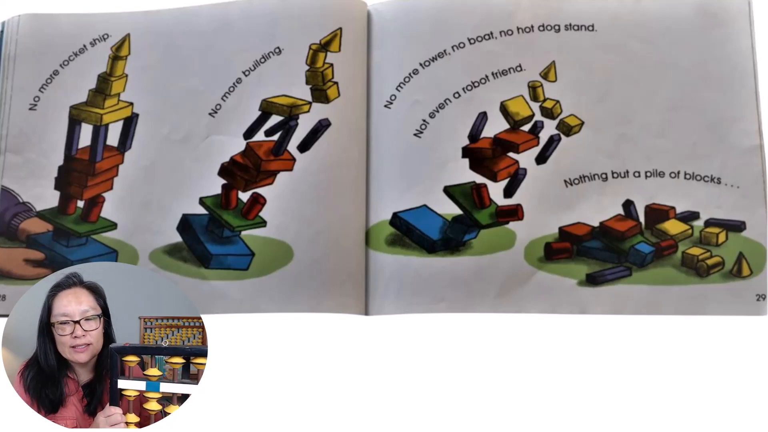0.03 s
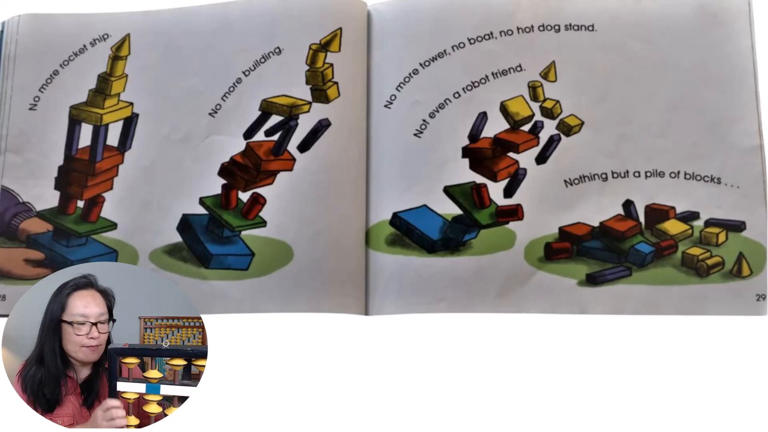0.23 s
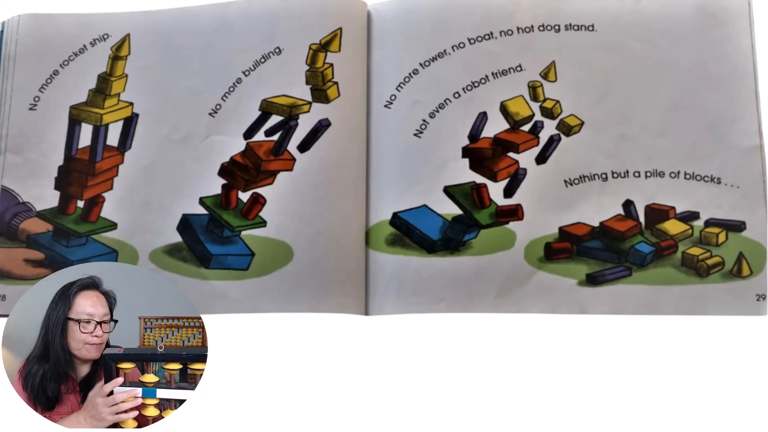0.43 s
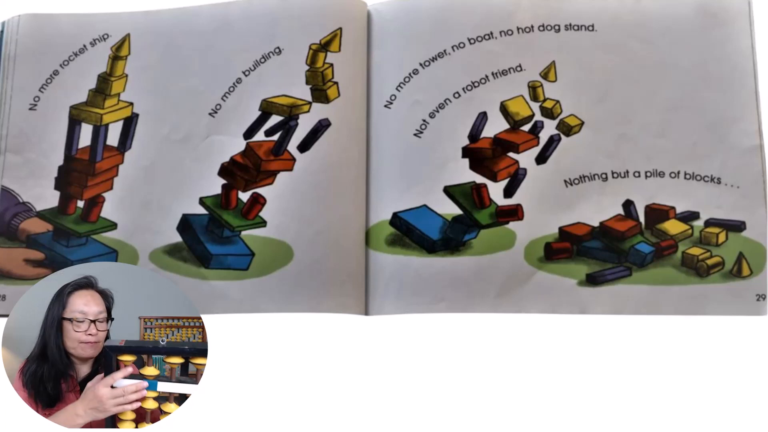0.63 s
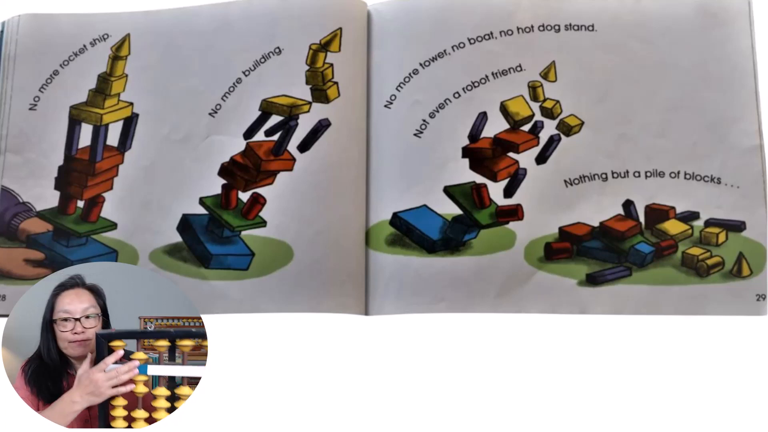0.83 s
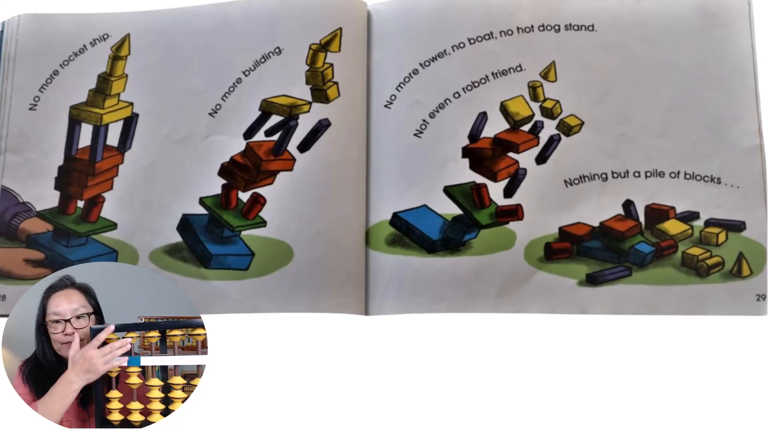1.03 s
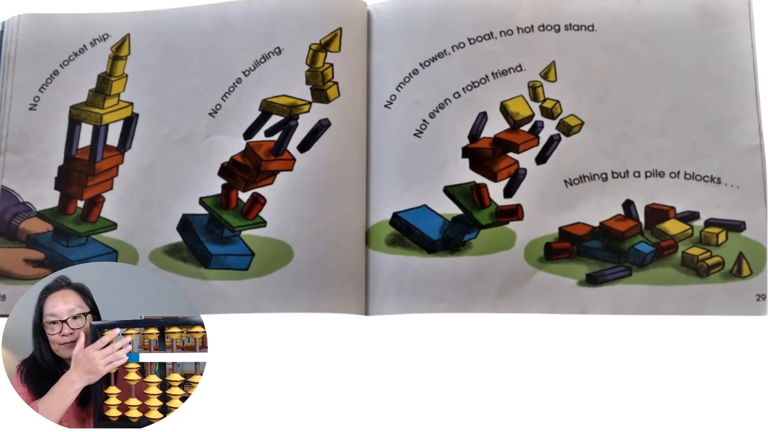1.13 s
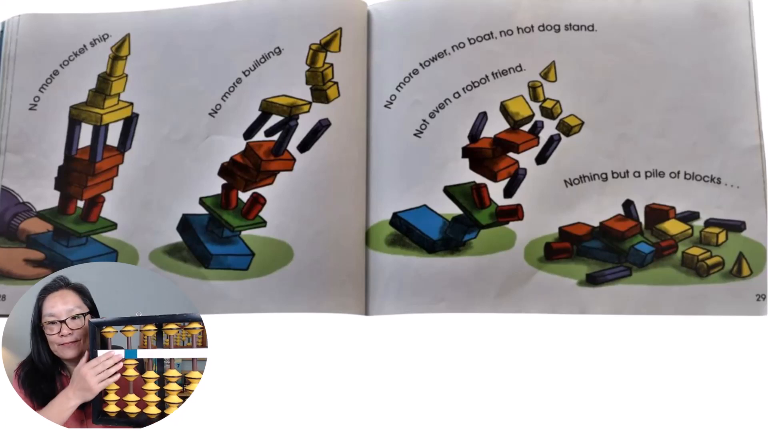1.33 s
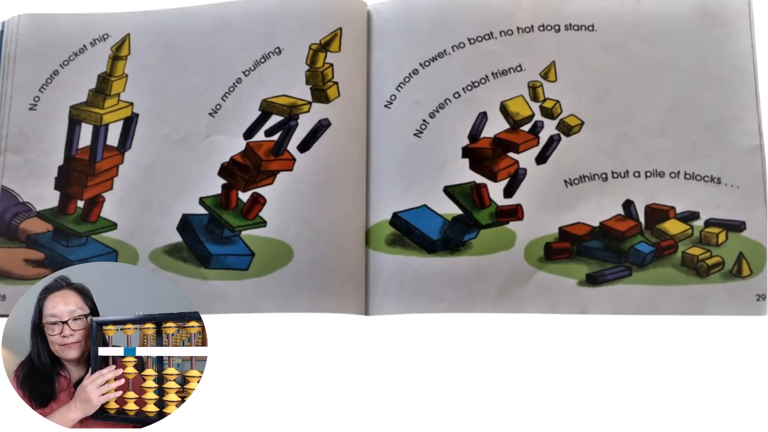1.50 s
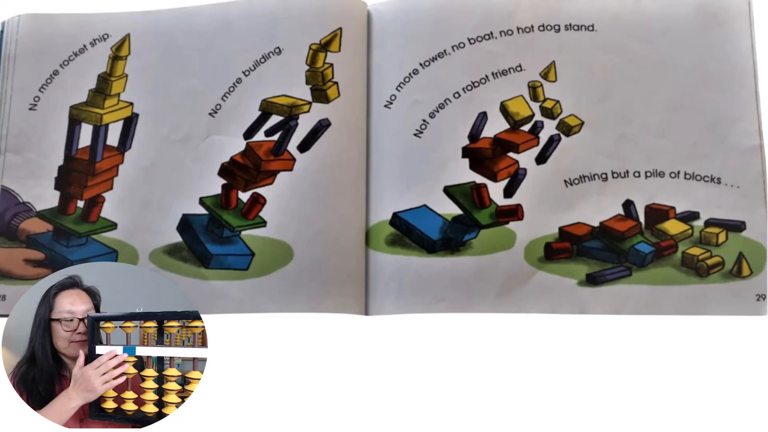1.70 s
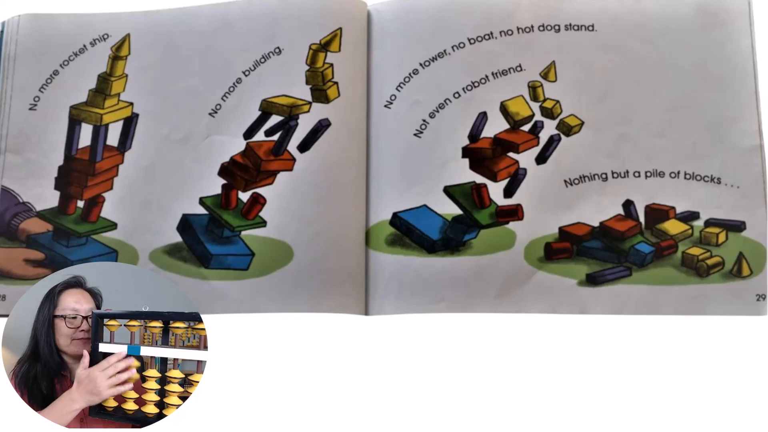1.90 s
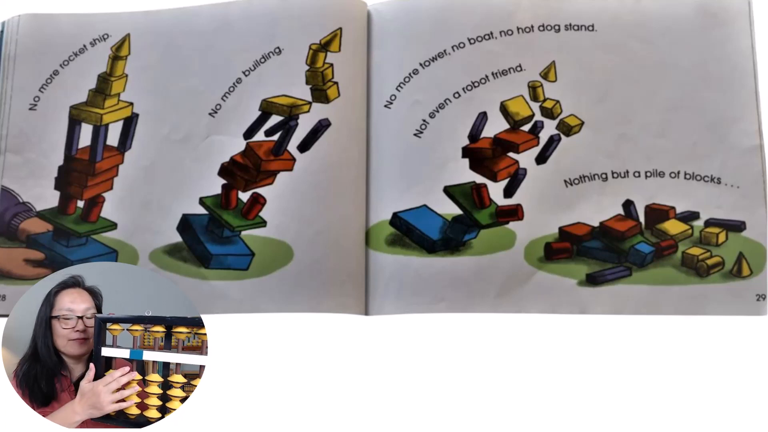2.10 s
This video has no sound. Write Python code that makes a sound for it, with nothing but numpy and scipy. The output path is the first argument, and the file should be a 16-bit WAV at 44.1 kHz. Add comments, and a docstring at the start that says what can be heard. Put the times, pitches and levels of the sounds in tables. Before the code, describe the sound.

Abacus beads slide and clack sharply three times among lighter ticks in a quiet room.

```python
"""A small quiet room, a computer microphone close to a large abacus whose beads a hand pushes along.
Beads hiss along their rods, tick against each other and clack into the beam three times.
Each contact is a short rattle that rings bead, wooden frame and rod and makes the frame thump.
The grip rustles at first; a short room tail follows the clicks, over faint hum and hiss."""
import sys
import numpy as np
from scipy import signal
from scipy.fft import rfft, irfft
from scipy.io import wavfile
from scipy.ndimage import uniform_filter1d

SR = 44100
rng = np.random.default_rng(int(sys.argv[2]) if len(sys.argv) > 2 else 0)


def wrap_up_sound(samples):
    """Save the sound to the file named by the first command line argument, as 16-bit audio."""
    columns = np.atleast_2d(samples).T
    # keep every value between -1 and 1, then stretch to whole-number steps
    tamed = np.clip(columns, -1, 1)
    steps = np.round(tamed * 32767).astype(np.int16)
    wavfile.write(sys.argv[1], SR, steps)


N = 94903


def undb(db):
    return 10 ** (np.asarray(db) / 20)


def at_rms(x, db):
    return x * undb(db) / np.sqrt(np.mean(x ** 2))


def at_peak(x, db):
    return x * undb(db) / np.abs(x).max()


def ring(x, hz, t60):
    """One decaying mode driven by x; it radiates little far below its pitch."""
    pole = np.exp(2j * np.pi * hz / SR - np.log(1000) / (t60 * SR))
    mode = signal.lfilter([1], [1, -pole], x).imag
    return signal.lfilter(*signal.butter(2, .5 * hz, "high", fs=SR), mode)


def band(hz, width, size=N):
    """Noise of rms 1 in a resonance."""
    return at_rms(signal.lfilter(*signal.iirpeak(hz, hz / width, SR), rng.standard_normal(size)), 0)


def drift(hz):
    """A smooth random wander of rms 1."""
    span = int(SR / hz)
    return at_rms(uniform_filter1d(uniform_filter1d(rng.standard_normal(N), span), span), 0)


# Hiss spectrum: (frequency [Hz], relative density [dB])
HISS_SPECTRUM = [(15, -32), (25, -5.5), (273, 0.5), (571, -18), (730, -11), (2100, -12), (2270, -19),
                 (2440, -25), (2690, -16), (6530, -18.5), (9000, -59.5), (11700, -65), (19800, -120)]
# Hum: (pitch [Hz], width [Hz], level [dB])
HUM_BANDS = [(100, 14, -74.5), (193, 5.4, -76), (240, 44, -70.5)]


def room_tone():
    """The bed of the room: faint, flickering hiss in half-octave bands and a wavering hum."""
    hz, db = np.array(HISS_SPECTRUM).T
    hiss = sum(undb(np.interp(np.log(f), np.log(hz), db) + .5 * drift(8)) * np.sqrt(f) * band(f, f / 3)
               for f in 30 * 2 ** np.arange(0, 8.2, .5))
    hum = sum(undb(hum_db) * band(f, width) for f, width, hum_db in HUM_BANDS)
    return at_rms(hiss, -73.5) + hum


# Decay of the small room: (band centre [Hz], t60 [s])
ROOM_DECAY = [(300, 0.44), (900, 0.2), (2000, 0.14), (4000, 0.19), (7000, 0.21)]
ROOM_DB, ROOM_GAP_S = -17.5, 0.0067
SPLIT_HZ = 2400  # between low and high, for the room's colour and the frame's modes


def room_tail(size):
    """The walls' dense response, weak this close to the source; each band has its own decay."""
    t = np.arange(size) / SR
    tail = sum(np.sqrt(hz) * band(hz, .61 * hz, size) * undb(-60 * t / t60) for hz, t60 in ROOM_DECAY)
    tail *= np.clip(t / ROOM_GAP_S - 1, 0, 1) * (t < .9 * t[-1])
    return undb(ROOM_DB) * tail / np.sqrt(np.sum(tail ** 2))


def reflections(direct, tail):
    """The walls hear the abacus from all sides, which evens out its colour in the tail."""
    size = len(direct)
    power = np.abs(rfft(direct)) ** 2
    fine, broad = (uniform_filter1d(power, int(blur_hz * size / SR)) for blur_hz in (454, 900))
    hz = np.arange(len(power)) * SR / size
    return irfft(np.sqrt(np.where(hz < SPLIT_HZ, fine, broad)) * rfft(tail))


# Hand on the frame: (time [s], rustle gain [dB], rumble level [dB])
GRIP_LEVELS = [(0, -68.5, -58), (0.04, -64, -73), (.12, -81.5, -74), (.16, -77, -75), (0.188, -69, -76),
               (0.218, -79.5, -68), (0.262, -65.5, -59), (.32, -78, -67), (.4, -81, -94), (.5, -82, -79),
               (0.55, -62.5, -65.5), (.6, -82, -76), (0.699, -102, -90)]
# Rustle colour: (centre [Hz], width [Hz], relative level [dB])
RUSTLE_BANDS = [(556, 750, 9), (1036, 170, 2.5), (2200, 440, -22.5), (5500, 11000, -3)]


def grip(t):
    """Fingers shift on the frame: a patchy rustle and a low rumble that die away."""
    times, rustle_db, rumble_db = np.array(GRIP_LEVELS).T
    rustle = sum(undb(db + 2.5 * drift(40)) * band(hz, width) for hz, width, db in RUSTLE_BANDS)
    rumble = band(hz=66, width=60)
    return undb(np.interp(t, times, rustle_db)) * rustle + undb(np.interp(t, times, rumble_db)) * rumble


# Bead pushes: (start [s], stop [s], gain at the stop [dB], rise [dB])
PUSHES = [(0.871, 0.985, -54, 29.5), (1.344, 1.412, -55, 12), (1.842, 1.956, -56, 2)]
# Bead rubbing on rod: (centre [Hz], width [Hz], relative level [dB])
FRICTION_BANDS = [(1820, 1200, -3), (4600, 1200, -1.5), (6900, 600, 0)]


def bead_slides(t):
    """A bead speeds up along its rod: grainy hiss that swells until it lands."""
    swell = sum(undb(db - rise_db * (stop - t) / (stop - start))
                * np.clip((t - start) / .02, 0, 1) * (t < stop) for start, stop, db, rise_db in PUSHES)
    grain = undb(1.5 * drift(150))
    return swell * grain * sum(undb(db) * band(hz, width) for hz, width, db in FRICTION_BANDS)


# Landed beads: (time [s], pitch [Hz], width [Hz], level [dB], t60 [s])
LANDINGS = [(0.99, 7000, 200, -41.5, 0.29), (1.725, 6680, 509, -51.5, 0.17)]


def bead_chatter(t):
    """A landed bead chatters on: a high, thin, grainy zing that fades."""
    return sum(undb(db - 60 * np.abs(t - start) / t60 + 4 * drift(120)) * (t > start) * band(hz, width)
               for start, hz, width, db, t60 in LANDINGS)


# Whole-frame modes: (pitch [Hz], relative gain [dB], t60 [s])
THUMP_MODES = [(64.5, -13.5, 0.033), (122, 6.5, 0.021), (210, -5.5, 0.03), (477, 1, 0.03)]


def frame_thump(impulse):
    """The blow shakes the whole frame in a few short, low modes."""
    return -sum(undb(db) * ring(impulse, hz, t60) for hz, db, t60 in THUMP_MODES)


# Rod modes: (pitch [Hz], relative gain [dB], t60 [s])
ROD_MODES = [(1000, -14, .06), (3345, -3, .075), (4390, 0, .11), (6400, -9, .08)]


def rod_ring(impulse, ms, noise, scatter):
    """A struck rod rings on with a wavering level, its modes balanced anew at each hit."""
    modes = sum(undb(db + 3 * draw) * ring(impulse, hz, t60)
                for (hz, db, t60), draw in zip(ROD_MODES, scatter))
    waver_db = 2.2 * at_rms(uniform_filter1d(noise, int(.005 * SR)), 0)
    onset = 1 - np.exp(-ms / .5)
    return modes * onset * undb(waver_db)


# Frame modes: (pitch [Hz], relative level [dB], t60 [s])
FRAME_MODES = [(836.5, -4, 0.064), (1075, -4.5, 0.031), (1290, -11, 0.03), (1871, -2.5, 0.023),
               (2050, 1, 0.012), (2810, 5, 0.011), (3331, 6.5, 0.0089), (3933, 10.5, 0.0044),
               (4713, 9.5, 0.0047), (5198, 5.5, 0.011), (6064, 4, 0.01), (6860, 7, 0.011), (7250, 3, 0.018)]


def frame_clack(knock, rattle, scatter, low_db, high_db):
    """The knock rings the frame's low modes, the rattle its high ones, slightly detuned at each hit."""
    low = high = 0
    for (hz, db, t60), draw in zip(FRAME_MODES, scatter):
        pitch = hz * (1 + .015 * draw)
        if hz < SPLIT_HZ:
            low += at_rms(ring(knock, pitch, t60), db)
        else:
            high += at_rms(ring(rattle, pitch, t60), db)
    return at_peak(low, low_db) + at_peak(high, high_db)


# Bead hits close to the microphone; levels are peaks, bead and frame ahead of their low cut:
# (time [s], rattle [ms], bead pitch [Hz], bead level [dB], bright pitch [Hz], bright level [dB],
#  frame low [dB], frame high [dB], rod level [dB], thump level [dB])
BEAD_HITS = [ (0.0105, 10.3, 398, -34, 5346, -42, -45, -35, -59, -89),
             (0.1875, 3.3, 1200, -50, 6400, -59, -50.5, -74, -76, -50),
             (0.232, 6.1, 2200, -70, 7440, -63, -66, -77, -83, -58),
             (0.246, 2.1, 1000, -68, 6900, -54, -65, -68, -80, -76),
             (0.2555, 12, 1960, -70, 4860, -51, -49.5, -53, -72, -63),
             (0.2783, 1.6, 900, -36.5, 6810, -50.5, -30, -46.5, -80, -71),
             (0.531, 9.3, 1230, -46, 3340, -50, -48, -72, -76, -74),
             (0.5385, 3.4, 2390, -33.5, 4440, -34, -49, -51, -58, -81),
             (0.5395, 3.9, 3620, -30, 6300, -28.5, -65, -30, -53, -81),
             (0.6494, 5.3, 1945, -50.5, 7760, -68, -87, -65, -65, -81),
             (0.7055, 1.4, 1920, -77.5, 6200, -62.5, -53.5, -55.5, -102, -82.5),
             (0.7255, 1.4, 3450, -68.5, 6500, -57, -66.5, -77, -68.5, -93),
             (0.817, 3.6, 2120, -74, 6730, -60.5, -67.5, -78, -73, -76.5),
             (0.968, 27, 1670, -48.5, 7000, -65.5, -53, -69.5, -44.5, -84),
             (0.9866, 2.9, 1383, -9, 6900, -15, -17.5, -8, -49, -34.5),
             (0.9873, 6.5, 2120, -10, 2540, -14.5, -30.5, -11.5, -60.5, -62),
             (1.03, 4.6, 1510, -47.5, 6900, -48.5, -56, -50.5, -87, -51.5),
             (1.0899, 1.6, 1825, -48, 6900, -70, -69.5, -37.5, -35.5, -81),
             (1.131, 7.9, 1860, -55.5, 6900, -80, -56.5, -52, -90, -79),
             (1.2126, 2.9, 6390, -39.5, 4600, -36, -43.5, -36, -65, -81),
             (1.3129, 4.1, 1650, -60.5, 6570, -80, -53.5, -54, -55.5, -65.5),
             (1.3848, 41, 942, -39.5, 6050, -44.5, -32, -27.5, -66.5, -84.5),
             (1.4035, 4, 2590, -50.5, 6500, -39.5, -58, -26, -76, -90),
             (1.4127, 2.2, 3720, -15, 6400, -4, -9, 2.5, -43, -26.5),
             (1.6357, 2.05, 2570, -53, 5200, -53, -49, -45, -49, -89),
             (1.661, 2, 2110, -66, 3300, -55, -54.5, -62.5, -59, -102),
             (1.721, 7.8, 975, -38.5, 6290, -22, -34, -17.5, -22.5, -64.5),
             (1.8213, 2, 1000, -46, 4670, -28, -38, -41, -76.5, -69),
             (1.8682, 5, 2195, -37.5, 6670, -39.5, -37, -41.5, -32.5, -75),
             (1.938, 3.05, 1857, -9, 6265, -16, -11, -2.5, -54, -27.5),
             (2.093, 2.2, 2930, -96, 4900, -62.5, -63.5, -62, -89, -87),
             (2.108, 1.8, 5000, -66.5, 6700, -60.5, -61.5, -61.5, -84, -70.5)]
ATTACK_MS, FADE_MS, RELEASE_MS = .29, 3.9, 2.6
KNOCK_SHARE = .43  # of the rattle: the low modes answer mostly to its first contacts


def bead_clicks(size=16384):
    """A bead hits a neighbour or the beam in a dense rattle; bead, frame, rod and room answer."""
    out, ms = np.zeros(N + size), np.arange(size) * 1000 / SR
    impulse = signal.unit_impulse(size)
    low_cut = signal.butter(3, 655, "high", fs=SR, output="sos")
    tail = room_tail(size)
    for start, rattle_ms, hz, db, bright_hz, bright_db, low_db, high_db, rod_db, thump_db in BEAD_HITS:
        noise = rng.standard_normal(size)
        scatter = noise[::-1]  # one random draw per mode
        decay = np.exp(-ms / FADE_MS - np.maximum(ms - rattle_ms, 0) / RELEASE_MS)
        rattle = noise * np.minimum(ms / ATTACK_MS, 1) * decay
        knock = rattle * np.exp(-ms / (KNOCK_SHARE * rattle_ms))
        bead = at_peak(ring(knock, hz, t60=.025), db)
        bead += at_peak(ring(rattle, bright_hz, t60=.022), bright_db)
        frame = frame_clack(knock, rattle, scatter, low_db, high_db)
        direct = signal.sosfilt(low_cut, bead + frame) + at_peak(frame_thump(impulse), thump_db)
        rod = at_peak(rod_ring(impulse, ms, noise, scatter[len(FRAME_MODES):]), rod_db)
        i = int(start * SR)
        out[i:i + size] += direct + rod + reflections(direct, tail)
    return out[:N]


def scene():
    """Mono at the microphone: the abacus up close, the room behind it."""
    t = np.arange(N) / SR
    return (bead_clicks() + bead_slides(t) + bead_chatter(t) + grip(t) + room_tone())[None]


def record(dry):
    """The microphone chain rolls off treble and deep bass, rounds the loudest peaks and cuts the top."""
    soft = signal.sosfilt(signal.butter(11, 7350, fs=SR, output="sos"), dry)
    soft = signal.sosfilt(signal.butter(2, 34, "high", fs=SR, output="sos"), soft)
    rounded = .85 * np.tanh(soft / .85)
    return signal.sosfilt(signal.ellip(8, .2, 70, 9100, fs=SR, output="sos"), rounded)


dry = scene()
out = record(dry)
wrap_up_sound(out)
```